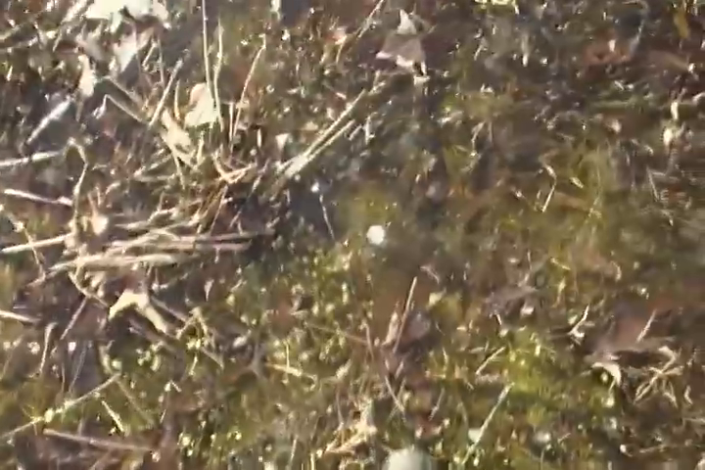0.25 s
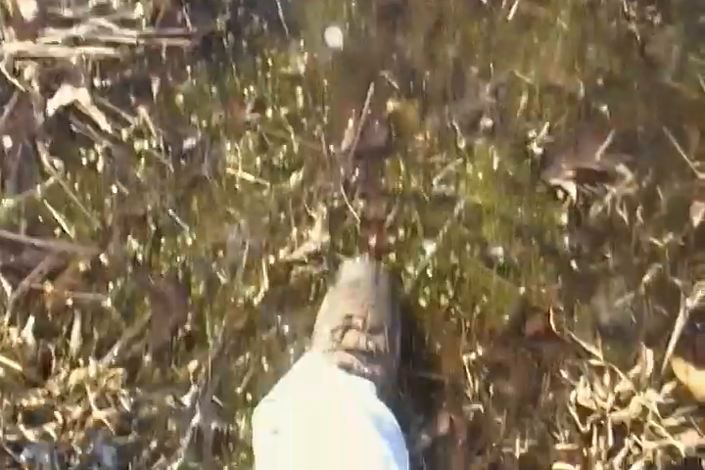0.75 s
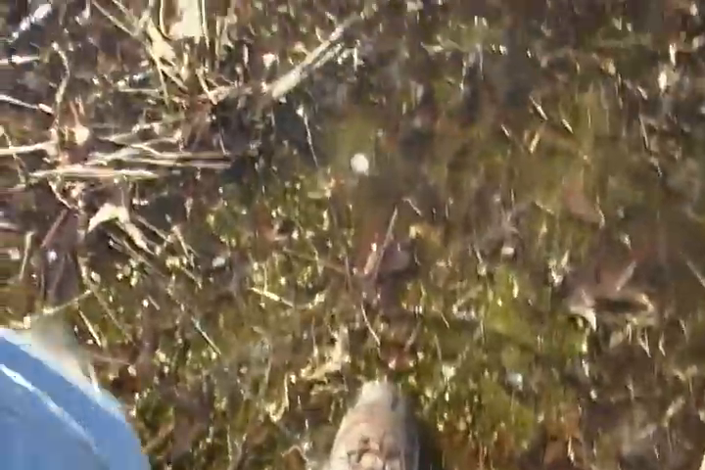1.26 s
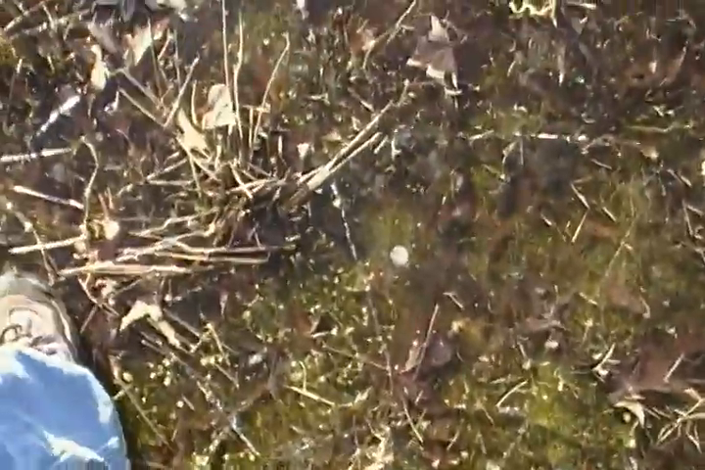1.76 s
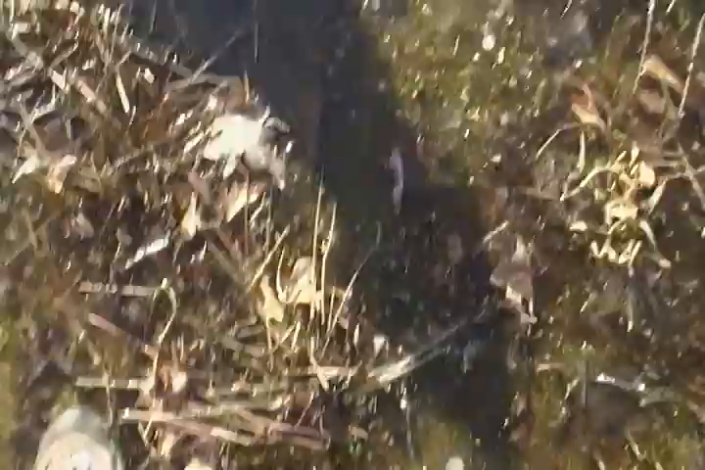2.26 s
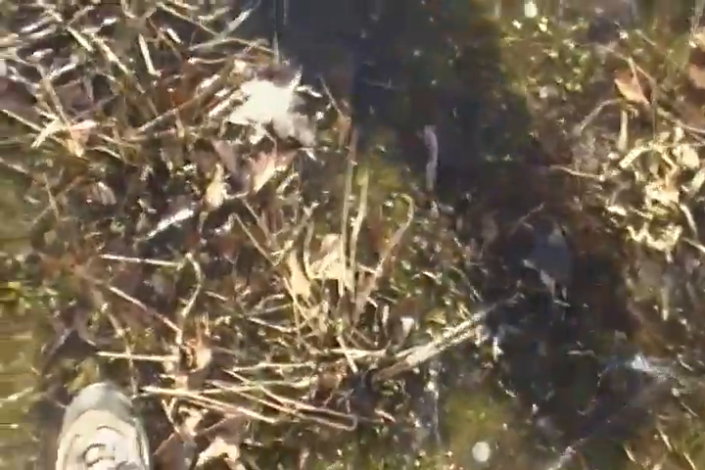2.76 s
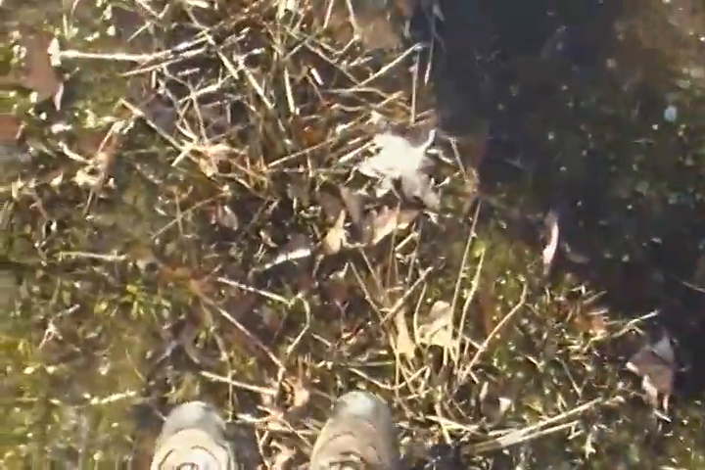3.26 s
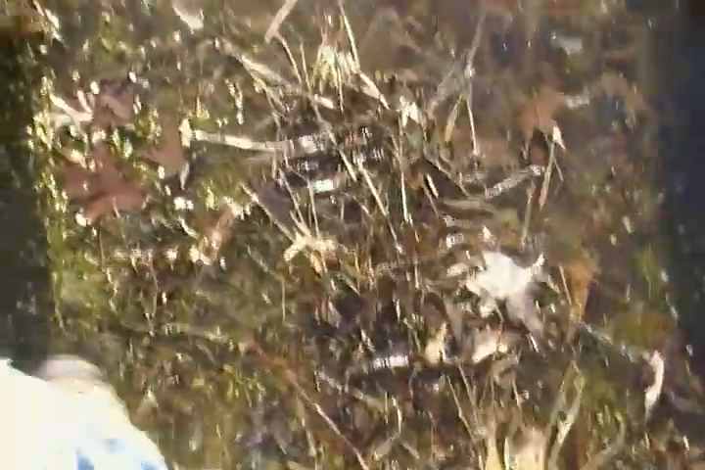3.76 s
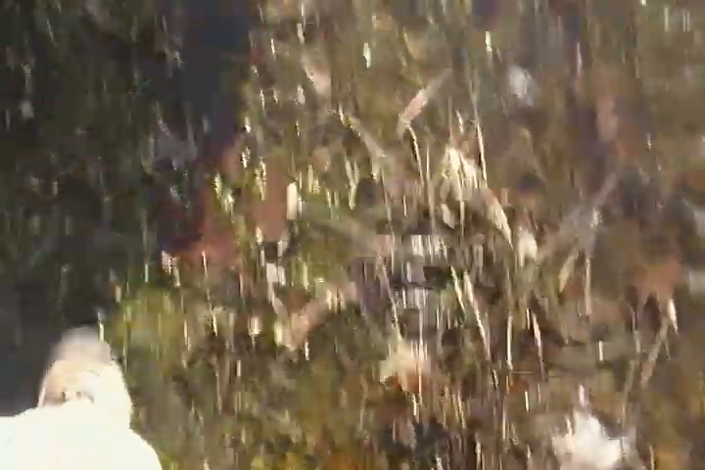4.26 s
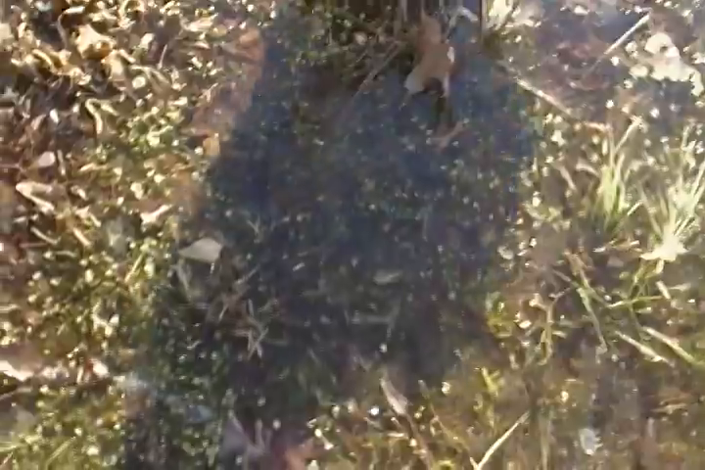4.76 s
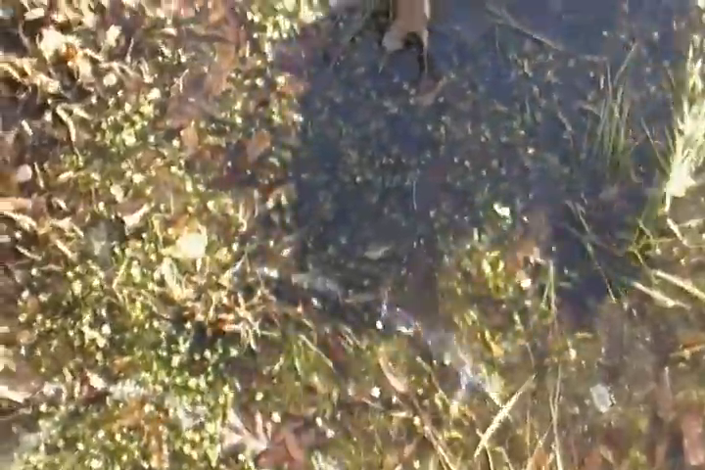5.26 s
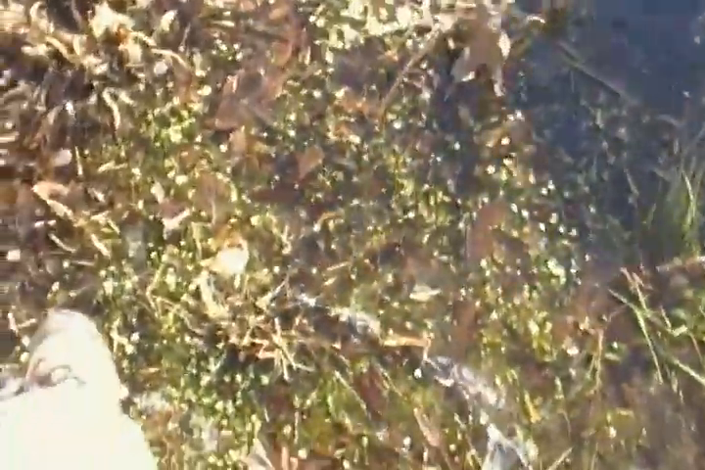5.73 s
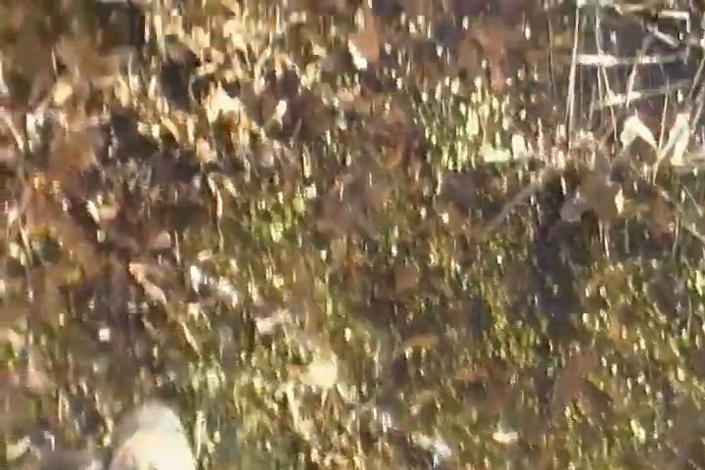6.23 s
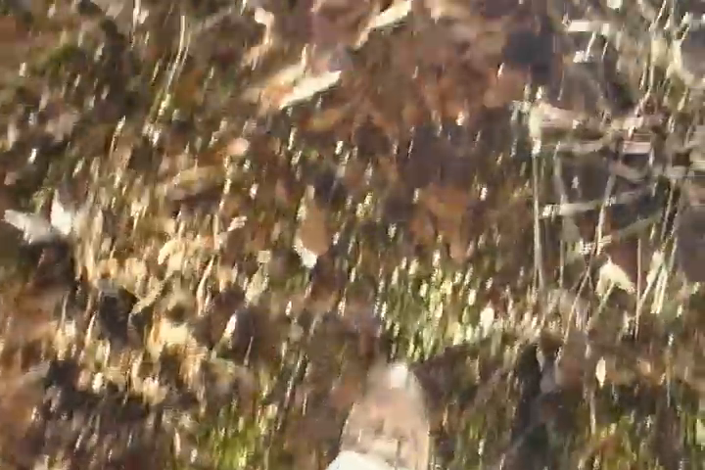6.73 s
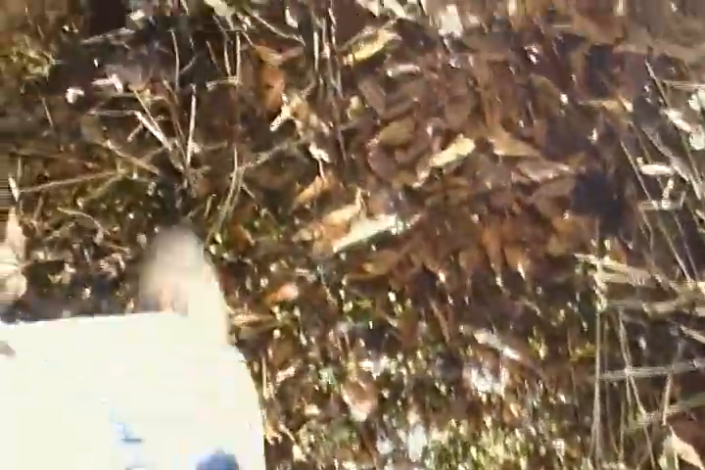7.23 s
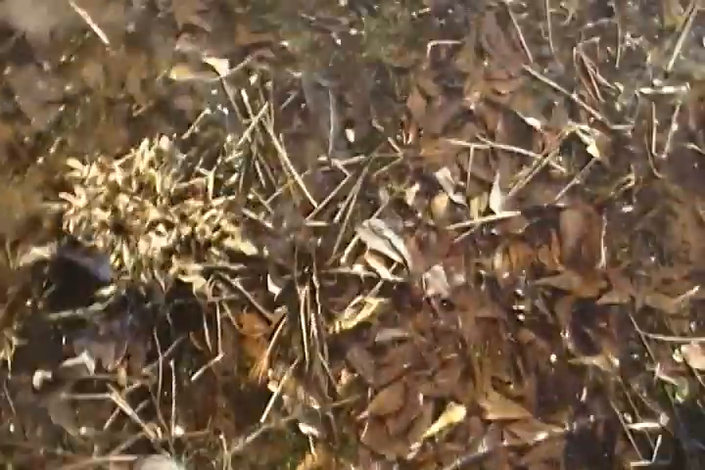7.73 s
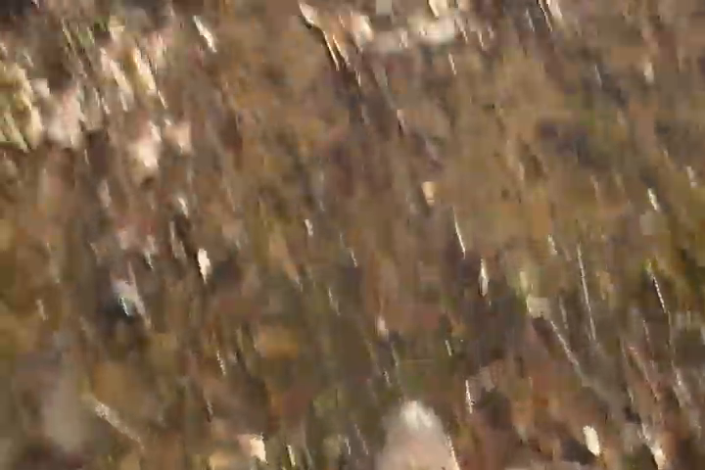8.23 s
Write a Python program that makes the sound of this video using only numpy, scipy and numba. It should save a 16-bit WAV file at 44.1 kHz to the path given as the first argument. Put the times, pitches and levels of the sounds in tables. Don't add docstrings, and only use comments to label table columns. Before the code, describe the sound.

Close crackling of thin ice underfoot, snapping and crunching in uneven bursts, with dull knocks below and strong wind buffeting toward the finish.

```python
import sys
import numpy as np
from scipy import signal
from scipy.fft import rfft, irfft
from scipy.io import wavfile
from scipy.ndimage import uniform_filter1d
from numba import njit

SR = 44100
rng = np.random.default_rng(int(sys.argv[2]) if len(sys.argv) > 2 else 0)


def boost(x):
    u = np.asarray(x, float) / 20
    return 10 ** u


def output_pcm(signal):
    pcm = np.clip(np.atleast_2d(signal).T, -1, 1) * 32767
    wavfile.write(sys.argv[1], SR, np.round(pcm).astype(np.int16))


N = 374320


def level(x, db):
    return x * boost(db) / np.sqrt(np.mean(x ** 2))


def on_hz(table):
    hz, value = np.transpose(table)
    return np.interp(np.log(np.fft.rfftfreq(N, 1 / SR) + 1), np.log(hz), value)


def colour(x, table):
    return irfft(rfft(x) * boost(on_hz(table)), N)


def walk(rate):
    hold = int(SR / rate)
    steps = np.repeat(rng.standard_normal(N // 256), hold)[:N + hold]
    slewed = uniform_filter1d(uniform_filter1d(steps, hold), hold)
    return 0.94 * slewed[:N]


def pair(likeness):
    c = np.clip(likeness, 0, 1)
    mid, side = rng.standard_normal((2, N))
    opposed = side * np.array([[1], [-1]])
    return (np.sqrt(1 + c) * mid + np.sqrt(1 - c) * opposed) / np.sqrt(2)


def swells(table, rise_db, fall_db, rest_db):
    t = np.arange(0, N, 32) / SR
    power = 0
    for s, held, db in table:
        early, late = np.maximum(s - t, 0), np.maximum(t - s - held, 0)
        power = power + boost(2 * (db - rise_db * early - fall_db * late))
    return 10 * np.log10(np.interp(np.arange(N) / SR, t, power) + boost(2 * rest_db))


@njit
def chirps(start, hz, size, cycles, lead, settle):
    out = np.zeros(N + 8192)
    for e in range(len(start)):
        step = 2 * np.pi * hz[e] / SR
        fall = np.exp(-hz[e] / SR / settle)
        length = cycles[e] * SR / hz[e]
        over, phase = lead, 0.
        for i in range(int(7 * length)):
            phase += min(step * (.85 + over), 2.)
            envelope = np.sqrt(i / length) * np.exp(-i / length)
            out[int(start[e]) + i] += size[e] * envelope * np.sin(phase)
            over *= fall
    return out[:N] / np.sqrt(.5 / np.e)


def fractures(at, hz, db, turns, lag_spread):
    chance = rng.standard_normal((len(at), 4)).T
    size = boost(db) * np.sign(chance[0])
    cycles = turns * (hz / 2000) ** 0.68 * np.exp(0.086 * chance[1])
    lag, pan = lag_spread * chance[2], boost(0.72 * chance[3])
    return np.array([chirps(at + lag / 2 + 9, hz, size * pan, cycles, 0.91, 0.38),
                     chirps(at - lag / 2 + 9, hz, size / pan, cycles, 0.71, 0.64)])


def puffs(at, db, ms, table, likeness):
    hits = np.bincount(at.astype(int), boost(2 * db), N)[:N]
    gate = signal.lfilter([1], [1, -np.exp(-1000 / (ms * SR))], hits)
    return np.sqrt(gate) * level(colour(pair(likeness), table), 0)


def swarm(at, hz, db, ms, count):
    chance = rng.standard_normal((len(at), count, 2))
    wait = rng.exponential(size=(len(at), count)) * ms * SR / 1000
    pitch = np.clip(hz[:, None] * np.exp(0.57 * chance[..., 0]), 200, 6000)
    size = db[:, None] + 2 * chance[..., 1] - 900 * wait / SR
    when = np.minimum(at[:, None] + wait, N - 40)
    return fractures(when.ravel(), pitch.ravel(), size.ravel(), turns=0.68, lag_spread=1.6)


# t/s, level/dB
BREEZE = [
    (0, -25),
    (2, -28.5),
    (3.2, -32),
    (4.4, -29.5),
    (5.2, -26),
    (5.4, -35.5),
    (5.6, -28.5),
    (6.9, -35),
    (7.2, -36),
]
# t/s, held/s, level/dB
GUSTS = [(.05, 0.076, -16.5), (.14, 0.13, -18.5), (4.62, .06, -27), (5.72, 0.11, -17.5), (5.88, .14, -32),
         (6.3, 0.096, -19), (6.54, 0.059, -16), (6.66, .08, -20.5), (6.8, 0.039, -15), (7.29, .07, -19),
         (7.5, 0.19, -10.5), (7.68, 0.052, -9), (7.79, 0.27, -11.5), (8.1, .15, -12.5), (8.3, 0.053, -9),
         (8.4, .1, -12)]


def buffeting():
    t, db = np.transpose(BREEZE)
    breeze_db = np.interp(np.arange(N) / SR, t, db)
    return swells(GUSTS, rise_db=258, fall_db=139, rest_db=breeze_db)


# f/Hz, level/dB
GUST_SPECTRUM = [(12, -15), (22, 0.5), (50, 1), (90, -3.5), (150, -18), (600, -112)]
# f/Hz, level/dB
FLUTTER_SPECTRUM = [(60, -32), (120, 4), (190, -3), (330, -15.5), (600, -30), (1500, -89)]


def wind():
    db = buffeting()
    throb = 3.2 * np.array([walk(14), walk(14)])
    windward = .035 * np.maximum(db + 32, 0) * np.array([[1], [-1]])
    rumble = level(colour(pair(likeness=.25), GUST_SPECTRUM), 0)
    flutter = boost(1.0 * (db + 7) - 9) * level(colour(pair(likeness=.25), FLUTTER_SPECTRUM), 0)
    return boost(db + 0.43 + throb + windward) * (rumble + flutter)


# f/Hz, level/dB
AIR_SPECTRUM = [(90, -18), (130, 4), (300, -5), (850, -20.5), (1600, -17), (6600, -55), (10600, -49),
                (12800, -50)]


def air():
    gust_duck = -.4 * np.maximum(buffeting() + 28, 0)
    crunch_duck = -0.61 * (uniform_filter1d(load(), SR) + 28.5)
    return boost(gust_duck + crunch_duck) * level(colour(pair(0.93), AIR_SPECTRUM), -37)


# t/s, held/s, level/dB
PRESSES = [(.21, 0.28, -21), (.77, 0.018, -29), (1.05, 0.071, -37.5), (1.22, 0.12, -22.5), (1.62, 0.1, -21),
           (2.315, 0.037, -18), (2.43, 0.17, -28.5), (2.7, 0.044, -18), (2.88, .08, -34.5),
           (3.235, 0.043, -20), (3.35, .15, -32.5), (3.57, .21, -20), (3.86, 0.31, -30),
           (4.07, 0.13, -19.5), (4.5, 0.15, -35), (4.69, 0.085, -18), (4.87, 0.2, -18.5), (5.15, .2, -23.5),
           (5.4, 0.11, -18), (5.6, 0.32, -22), (6.0, 0.29, -25), (6.29, 0.06, -18.5), (6.43, 0.15, -20.5),
           (6.63, .12, -18.5), (6.93, .33, -18), (7.36, 0.17, -19.5), (7.62, 0.092, -28), (7.8, 0.074, -37),
           (8.135, 0.047, -25), (8.32, 0.26, -27)]


def load():
    return swells(PRESSES, rise_db=236, fall_db=158, rest_db=-42)


# f/Hz, level/dB
SHEET_SPECTRUM = [(300, -6.5), (700, -2), (1300, -1.5), (2300, 0.5), (4000, -1.5), (5500, -5.5),
                  (7500, -9.5)]
# f/Hz, level/dB
SPLINTER_SPECTRUM = [(3000, -16), (5200, -4), (6800, -6), (10500, -3), (11900, -9), (13000, -62)]
# f/Hz, level/dB
SLUSH_SPECTRUM = [(150, 8.5), (300, -1), (550, 0.5), (900, -4), (1600, -30), (5000, -83)]


def crunch(count=10000):
    load_db = load()
    burst_db = 3.1 * walk(90)
    chance = rng.random((count, 3)).T
    at = chance[0] * (N - 40)
    hz = 1000 * (5000 / 1000) ** chance[1]
    burst_there = burst_db[at.astype(int)]
    db = np.minimum(-3.9 * np.log(1 - chance[2]), 17) + burst_there
    flake_db = db + 4.13 * np.log2(hz / 2000)
    grains = level(fractures(at, hz, flake_db, turns=0.74, lag_spread=2.1), -3.4)
    grind = boost(burst_db - 7) * level(colour(pair(0.87), SHEET_SPECTRUM), 0)
    spit = puffs(at, db - burst_there / 2, ms=1.0, table=SPLINTER_SPECTRUM, likeness=0.23)
    spit = level(spit, -4.5)
    squelch_db = 0.028 * (load_db + 32.5) + 3.2 * walk(40)
    slush = boost(squelch_db) * level(colour(pair(0.91), SLUSH_SPECTRUM), -36)
    return boost(load_db) * (grains + grind + spit) + slush


# t/s, level/dB (rms), f/Hz (centre)
TEARS = [(.062, -17, 3060), (.079, -10, 2670), (.285, -14, 2030), (.34, -1.5, 2820), (.368, -13, 2700),
         (.416, -20, 1600), (.596, -12.5, 2478), (.07, -10.5, 2300), (1.047, -15.5, 2000),
         (1.112, -15, 2500), (1.174, -10, 1520), (8.134, -3, 3300), (1.993, -23, 3520), (2.087, -19, 3920),
         (3.163, -13.5, 2080), (3.575, -12, 3560), (3.746, -6, 3020), (3.84, -8, 1850),
         (4.647, -11.5, 2230), (4.712, -5.5, 1970), (4.728, -6, 2400), (4.767, -7, 2930), (4.853, -6, 3400),
         (5.161, -6.5, 3260), (5.474, -2, 3270), (6.344, -13, 3300), (7.029, -1.5, 2650),
         (7.317, -3.5, 2440), (7.801, -16.5, 1800), (8.121, -6.5, 1400)]


def tears():
    s, db, hz = np.transpose(TEARS)
    spit = puffs(s * SR, db - 10.5, ms=2.5, table=SPLINTER_SPECTRUM, likeness=0.35)
    return swarm(s * SR, hz, db - 6.0, ms=4.8, count=12) + spit


# t/s, level/dB (peak), f/Hz (chirp centre)
SNAPS = [(.2135, 0.5, 2340), (.266, 2, 1770), (.3884, -.5, 3500), (.4383, -0.5, 4600), (.4815, 1.5, 3280),
         (1.2065, -4.5, 1340), (1.7552, -1.5, 3870), (2.2984, 10, 3280), (2.4734, -4, 3280),
         (2.5775, -2, 1110), (2.6472, -0.5, 2560), (2.7212, 0, 4560), (3.1082, -10.5, 3160),
         (3.4142, 8, 1920), (3.4435, -7, 3430), (3.4568, 3.5, 2110), (3.7814, -6, 3670), (4.161, -4, 2020),
         (4.49, 0.5, 2400), (4.5305, -1, 1660), (4.5639, -8, 1820), (4.7438, .5, 1750), (5.3874, 1.5, 2660),
         (5.852, -1, 2360), (5.9503, 3.5, 2940), (6.9165, 0, 1770), (8.0395, -9.5, 2060),
         (8.3965, -4, 2650), (8.4085, -3, 3560), (8.4218, -4, 1740)]
# t/s, level/dB (peak), f/Hz (chirp centre)
SPLITS = [(.7728, 2, 780), (.8127, -0.5, 1080), (1.594, -1.5, 2920), (2.5538, 1.5, 1290), (3.2312, 0, 3300),
          (3.5217, 1, 1790), (3.5443, 1, 2010), (3.6415, -3, 2940), (4.0444, 5.5, 1700), (4.0857, 0, 3130),
          (5.0802, -1, 4000), (5.0979, -4, 3880), (5.2017, -6, 4080), (5.2453, 0.5, 4440),
          (5.2754, 6.5, 1350), (5.58, -1, 4540), (5.6486, -1.5, 3600), (5.74, -2.5, 3400),
          (5.9915, -4, 3200), (6.1144, -10, 3020), (6.152, -1, 3520), (6.1879, 6, 2300), (6.8017, 4, 3200),
          (6.9555, 6, 1960), (7.4372, -2.5, 2960), (7.6868, -5, 1830), (7.882, -16.5, 2670),
          (8.3116, 0.5, 636), (2.2198, -10.5, 2160), (.1521, 8, 3520)]
# t/s, level/dB (peak), f/Hz (chirp centre)
CRACKS = [(.759, -9.5, 4000), (3.6685, -10, 2050), (.466, -5, 3100), (1.167, -4.5, 780),
          (1.3198, -10.5, 2740), (1.5464, -10, 3170), (1.72, -3, 2880), (2.3642, -3, 2980),
          (2.3864, -7, 1530), (2.435, -1.5, 2230), (2.5435, -2, 1140), (2.5619, -5, 537),
          (2.5916, -5.5, 2640), (2.6688, -5.5, 1870), (3.1993, 2, 2430), (3.2243, -1, 1600),
          (3.2818, -6.5, 2700), (3.5952, -7.5, 1980), (3.7177, -4.5, 1540), (3.9152, -4, 1930),
          (3.963, -13.5, 1830), (4.577, -5, 2000), (4.6703, -2, 2160), (5.3361, -1, 2500),
          (5.4072, -4.5, 1930), (5.894, -5.5, 1950), (6.0168, -5.5, 3660), (6.89, -3, 2320),
          (8.305, -7, 2680), (8.3188, -1.5, 2480)]
# t/s, level/dB (splinters), f/Hz (chirp centre)
FLAKES = [(.74, -18.5, 3580), (.9364, -11, 3950), (1.013, -10.5, 1120), (1.1484, -1.5, 3260),
          (1.3893, -4, 2600), (1.768, -1.5, 1980), (1.9428, -16.5, 1610), (2.0444, -13.5, 2940),
          (2.2305, -2.5, 3710), (2.8584, -6.5, 4430), (3.3103, -4, 4020), (3.3513, 2.5, 3540),
          (3.3746, -5, 3520), (3.855, -6, 2520), (4.2434, -1, 3180), (5.1394, -4.5, 3200),
          (5.3041, 3, 3490), (5.556, 2.5, 2900), (5.8184, 0.5, 2800), (6.084, -3, 2970),
          (6.1203, -1.5, 3080), (6.1821, 1, 2520), (6.2592, 2, 4130), (6.2748, 0, 3480),
          (6.404, -3.5, 3430), (6.5842, 4, 4060), (6.8855, -0.5, 2750), (7.4944, -3, 2280),
          (7.727, -8, 2850), (8.345, -15, 2230)]
# events, chirp level/dB, splinter level/dB, rattle level/dB, relative to the event's
BREAKS = [
    (SNAPS, .1, -14, -18.5),
    (SPLITS, .1, -5.5, -19),
    (CRACKS, .1, -8.5, -6),
    (FLAKES, -21, .1, -17.5),
]


def cracks():
    rows = []
    for events, chirp, spit, rattle in BREAKS:
        for s, db, hz in events:
            rows.append((s, db + chirp, hz, db + spit, db + rattle))
    s, db, hz, spit_db, rattle_db = np.transpose(rows)
    at = s * SR
    spit = puffs(at, spit_db - 5.0, ms=0.33, table=SPLINTER_SPECTRUM, likeness=0.44)
    aftershocks = swarm(at + 50, hz, rattle_db + .5, ms=3.2, count=10)
    return fractures(at, hz, db - 2.5, turns=.72, lag_spread=0.9) + spit + aftershocks


# t/s, level/dB (peak), f/Hz
KNOCKS = [(.7725, -11.5, 400), (.8125, -19, 420), (1.1664, -15, 400), (2.545, -6, 356), (4.148, -11, 398),
          (5.738, -11.5, 500), (5.76, -22, 420), (5.813, -12, 437), (6.64, -16.5, 600), (6.68, -14, 440),
          (7.478, -10.5, 410), (7.492, -19, 372), (8.137, -12.5, 415), (8.184, -10.5, 378)]


def knocks():
    s, db, hz = np.transpose(KNOCKS)
    slosh = puffs(s * SR, db - 7.5, ms=14, table=SLUSH_SPECTRUM, likeness=1.0)
    return fractures(s * SR, hz, db, turns=1.0, lag_spread=1.4) + slosh


# f/Hz, phase/rad
PORT_PHASE = [(4500, 0.053), (5500, 1.94), (6500, 3.1), (9200, 5.7), (12500, 8.1)]


def scene():
    left, right = cracks() + tears() + knocks() + crunch()
    right = irfft(rfft(right) * np.exp(-1j * on_hz(PORT_PHASE)), N)
    return np.array([left, right]) + wind() + air()


def band_limit(x):
    return signal.sosfilt(signal.butter(12, 13340, fs=SR, output="sos"), x)


def record(dry):
    top_cut = signal.ellip(8, .2, 45, 12700, fs=SR, output="sos")
    mix = np.clip(signal.sosfilt(top_cut, dry), -1, 1)
    return band_limit(mix)


dry = scene()
out = record(dry)
output_pcm(out)
```